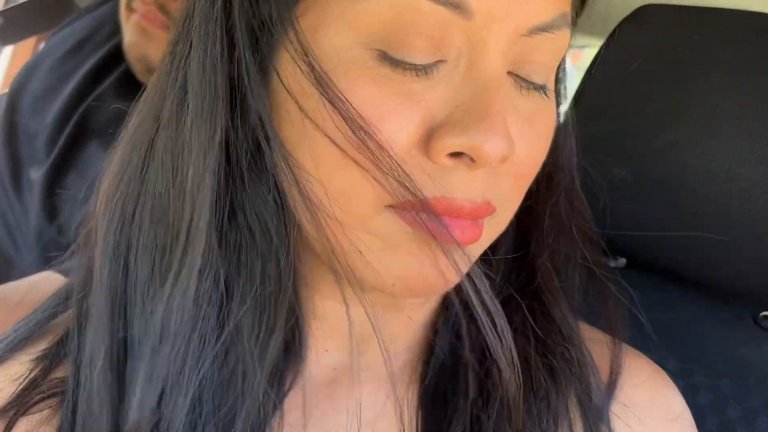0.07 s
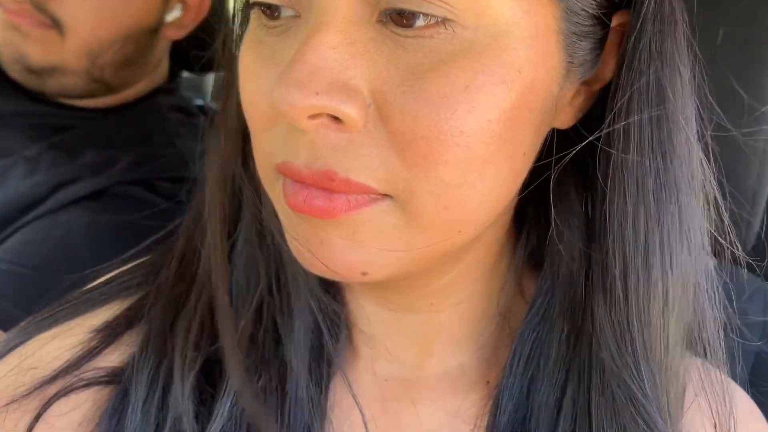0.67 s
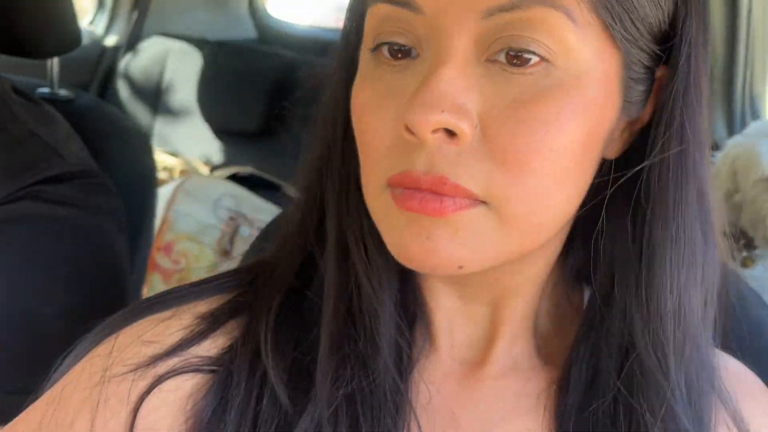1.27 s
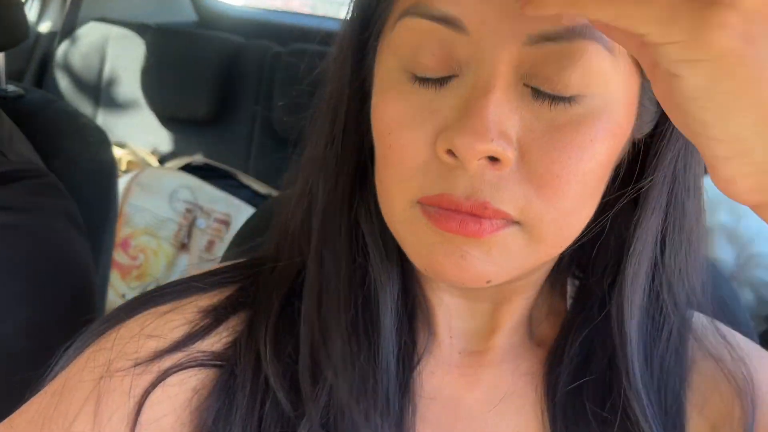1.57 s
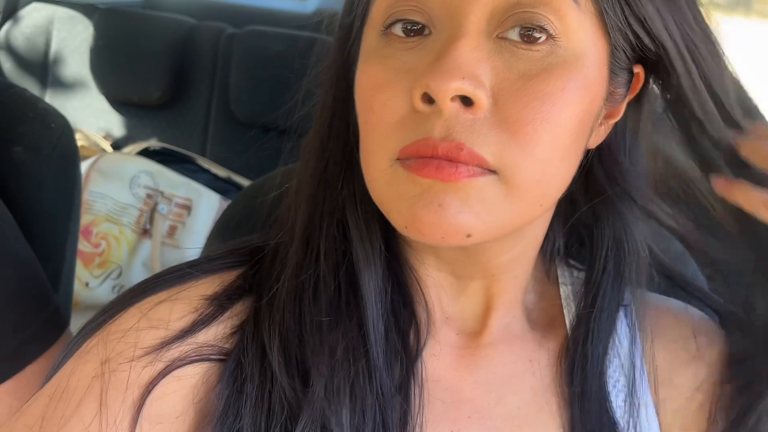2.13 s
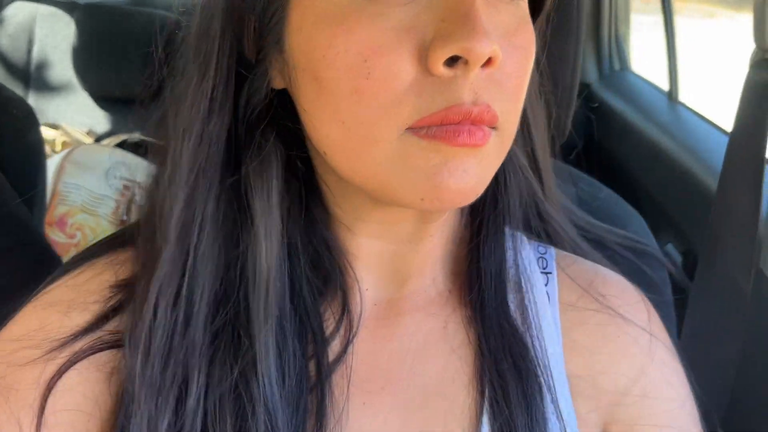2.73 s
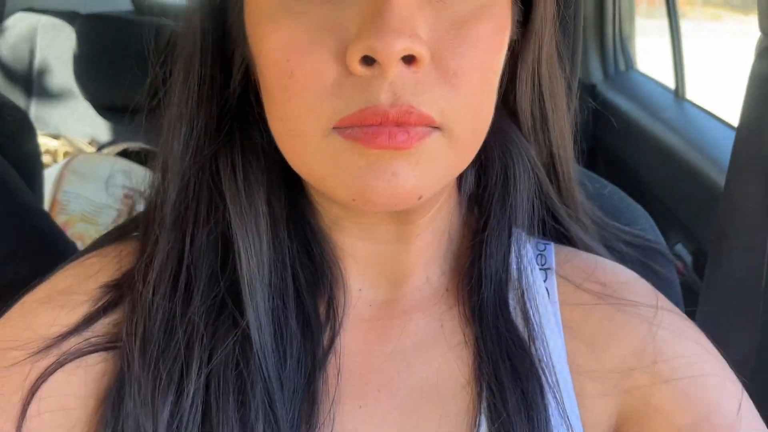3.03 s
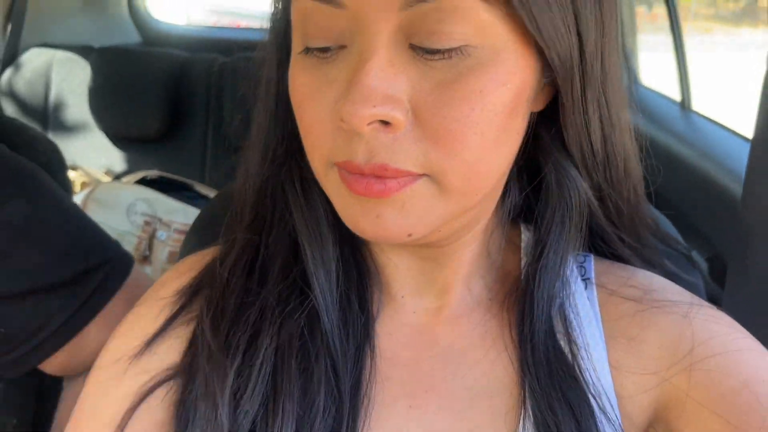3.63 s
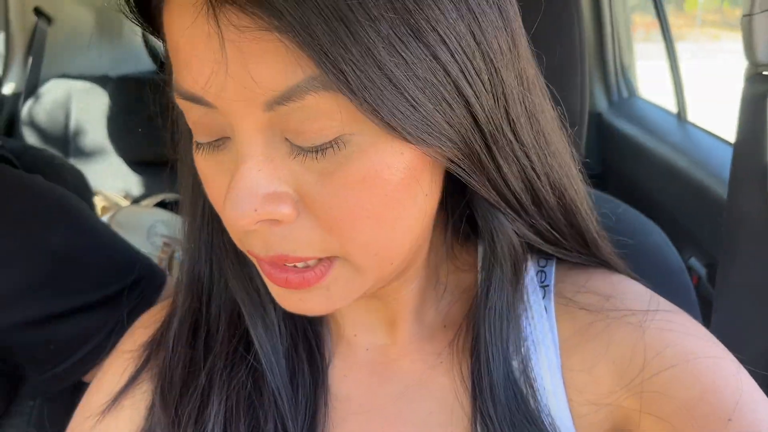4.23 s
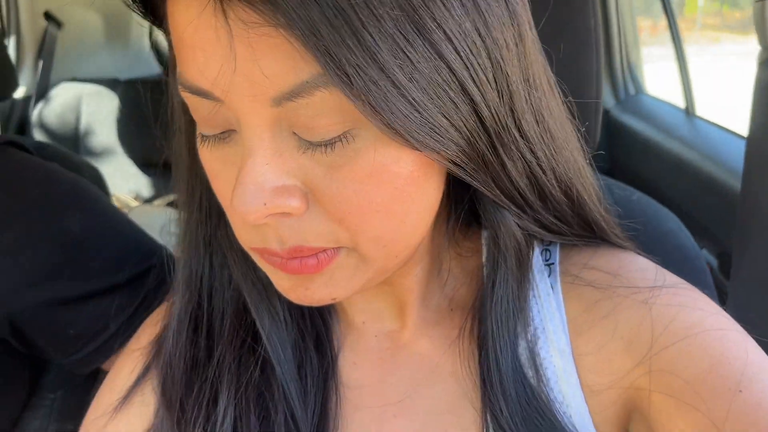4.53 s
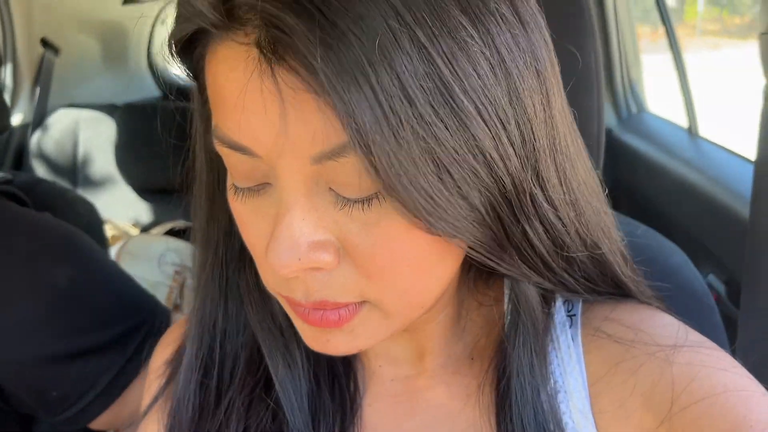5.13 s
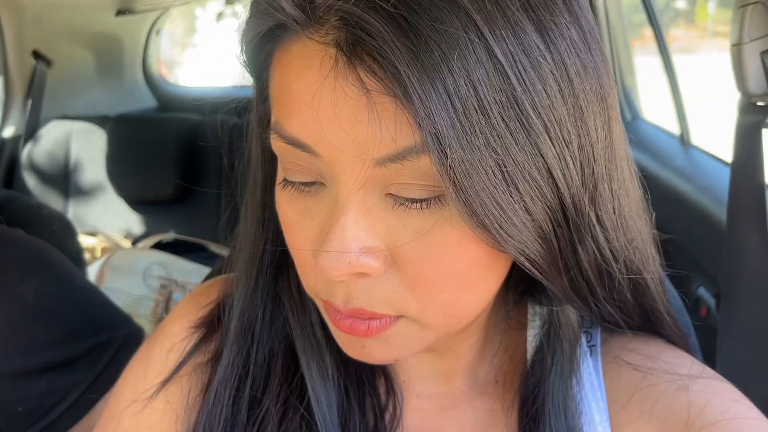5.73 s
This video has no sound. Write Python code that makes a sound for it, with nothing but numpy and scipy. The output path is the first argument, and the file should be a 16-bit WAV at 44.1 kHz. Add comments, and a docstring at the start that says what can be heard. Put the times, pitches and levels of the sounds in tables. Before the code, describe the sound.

Right at the start a car door is pulled shut, heard from inside: the latch scrapes and catches, the panel thuds and the cabin booms, dying away within half a second. This is the loudest sound. Under it and throughout, the engine idles with a low rumble and the vents blow steadily. From about 1 to 3 seconds hair rustles softly in several strokes, with one faint, thin squeak near 2.3 seconds. Soft bumps come through the floor between 2 and 2.5 seconds, and the vent noise shifts tone slightly as the microphone swings round. From 3 seconds to the end, irregular hollow clicks, plastic snaps and dry clacks sound close by. A low bump and a swell of rumble come at about 4.2 seconds as someone shifts in a seat. The clicks are busiest from 4.7 to 5.6 seconds, with a few dull knocks on the trim.

```python
"""A parked car idles with the vents blowing, and right away a door is pulled shut: the latch scrapes
and catches, the panel thuds, the cabin air booms. From about 1 s hair rustles, with one faint squeak,
and the car body rumbles as people shift in their seats. Between 2 and 3 s soft bumps come through the
floor and the vents change colour as the microphone swings round. From 3 s to the end, hollow clicks,
plastic snaps, dry clacks and knocks on the trim sound close by."""
import sys
import numpy as np
from scipy import signal
from scipy.fft import rfft, irfft
from scipy.io import wavfile

SR = 44100
rng = np.random.default_rng(int(sys.argv[2]) if len(sys.argv) > 2 else 0)


def generate_wav(sig):
    """Save sig (samples, or channels by samples) to the path in sys.argv[1] as 16-bit PCM at SR."""
    pcm = np.round(np.clip(np.atleast_2d(sig).T, -1, 1) * 32767).astype(np.int16)
    wavfile.write(sys.argv[1], SR, pcm)


N = 264467
TIME = np.arange(N) / SR
FREQS = np.maximum(np.fft.rfftfreq(N, 1 / SR), 1)

# how alike left and right sound: freq_hz, likeness
STEREO_LIKENESS = [(60, 0.84), (130, 0.9), (290, 0.4), (640, 0.3153), (1400, 0.4539), (3100, 1.04),
                   (6800, -0.4), (8000, 1)]
# how far the left side leads: freq_hz, phase_rad
STEREO_LEAD = [(60, -0.03), (290, -0.32), (700, 2.5), (1500, 3.5), (1780, 1.5), (2070, 2), (4400, 1.03),
               (7500, -4), (11000, -5.5), (15000, -9)]
# how much louder the left side is: freq_hz, balance_db
STEREO_BALANCE = [(60, -0.5), (120, 2.5), (400, 0.5), (1500, 0), (2300, 4.5), (3300, 1.5), (4400, 9),
                  (6500, 5), (9000, 0.5), (15000, -0.5)]

# idle harmonics: firing_multiple, level_db
IDLE_HARMONICS = [(1, -45), (4, -44), (6, -43.5), (7, -48.5), (8, -43), (10, -48), (24, -60.5)]
# blower tone: pitch_hz, level_db
BLOWER_TONE = [(211, -43.5)]
# colour of the engine bay drone: freq_hz, level_db
DRONE_EQ = [(60, 6.5), (100, -3.5), (145, -2.5), (178, -4.5), (205, -3.5), (240, -9), (330, -19.5),
            (500, -18.5)]
# colour of the car body rumble: freq_hz, level_db
RUMBLE_EQ = [(25, -30), (38, -3), (48, -12), (60, -1), (74, -8), (92, -13.5), (140, -10.5), (220, -33.5)]
# people shifting in their seats: peak_s, length_s, level_db
SEAT_SHIFTS = [(1.17, 0.17, -28.5), (1.33, 0.062, -27.5), (1.77, 0.1, -25), (2.13, 0.53, -25),
               (2.51, 0.1, -24), (4.21, 0.13, -20.5), (4.75, 0.28, -21), (5.2, 1, -28), (5.75, 0.29, -29.5)]
# colour of the vent air: freq_hz, level_db
VENT_EQ = [(120, -7.5), (260, 5), (380, 3), (430, -1.5), (520, 0.5), (850, -7.5), (1300, -9.5),
           (1700, -11.5), (2050, -16.5), (3100, -17), (5200, -23), (6600, -25.5), (8300, -42.5),
           (11000, -32.5), (13800, -40.5), (15500, -47)]
# the microphone's swing: start_s, end_s
SWING_SPAN = [2.3, 3.27]
# cabin resonances before and after the swing: freq_hz, width_hz, boost_db
PEAKS_BEFORE = [(524, 114, 6), (752, 130, 6), (1024, 120, 5.5), (1576, 350, 9.5), (2036, 180, 8),
                (2390, 150, 5), (2900, 140, 0), (3680, 150, 3.5), (4450, 89, 1), (5300, 230, 3.5)]
PEAKS_AFTER = [(342, 76, 2), (488, 89, 3.5), (750, 186, 5.5), (1076, 330, 6), (1560, 325, 10.5),
               (1980, 140, 1.5), (2340, 120, 9), (3630, 290, 6.5), (4400, 80, 7), (4800, 170, 9),
               (5260, 130, 7), (6100, 730, 3)]

# colour of the hair rustle: freq_hz, level_db
HAIR_EQ = [(1200, -13), (2500, -9), (4500, 0), (6200, -2.5), (8300, -24), (11500, -12), (14000, -14)]
# resonances in the rustle: freq_hz, width_hz, boost_db
HAIR_SHEEN = [(3600, 290, 3), (4470, 150, 3), (5120, 500, 6)]
# turns of the head and passes of the hand: peak_s, length_s, level_db
HAIR_STROKES = [(.8, 0.38, -60), (1.4, 0.75, -54), (1.92, 0.47, -52.5), (2.27, 0.69, -53.5),
                (2.68, 0.65, -51.5), (3.2, 0.59, -56), (4.2, 0.34, -57.5)]
# the hand sliding off the hair: peak_s, length_s, level_db
HAND_SLIPS = [(2.25, 0.079, -53)]

# soft bumps through the floor: start_s, level_db
FLOOR_BUMPS = [(2.066, -26), (2.195, -28), (2.289, -29), (2.478, -29.5), (4.180, -20.5)]
# floor and seat frame modes: pitch_hz, level_db, t60_s
FRAME_MODES = [(70.2, 16.5, 0.1), (106, -20, 0.023)]
# dull knocks on the trim: start_s, level_db
TRIM_KNOCKS = [(4.669, -19), (4.686, -18.5), (4.763, -17.5), (5.003, -18)]
# trim modes: pitch_hz, level_db, t60_s
TRIM_MODES = [(284, -4, 0.082), (420, 2.5, 0.029), (498, -0.5, 0.047), (750, -13, 0.028)]
# bright plastic ticks: start_s, pitch_hz, level_db
PLASTIC_TICKS = [(3.278, 2960, -42), (4.75, 3070, -21.5), (4.819, 3540, -32), (5.237, 4090, -33)]
# low, dry clacks: start_s, pitch_hz, level_db, t60_s, rise_s
DRY_CLACKS = [(3.018, 616, -12.5, 0.016, 0.001), (3.466, 706, -4, .012, 0.00057)]
# plastic snaps, many leading into a click or clack: start_s, body_db, top_db, t60_s
PLASTIC_SNAPS = [(3.05, -36.5, -49, 0.072), (3.277, -35, -64, 0.062), (3.463, -28, -40, .014),
                 (3.493, -33, -48, 0.011), (3.7255, -37, -58, .08), (4.128, -37, -42.5, 0.034),
                 (4.2175, -52, -48.5, .025), (4.662, -31, -39.5, 0.089), (4.7492, -26, -50, 0.1),
                 (4.755, -28, -33.5, 0.042), (4.819, -29, -41, 0.063), (4.997, -33, -38, 0.057),
                 (5.215, -38, -47, .025), (5.2362, -29, -40, 0.046), (5.3368, -37, -50, 0.072),
                 (5.3972, -38, -48, 0.072), (5.415, -37, -51, 0.055), (5.6414, -35, -46, 0.054)]
# colours of a snap's body and crisp top: freq_hz, level_db
SNAP_BODY_EQ = [(400, -22), (1400, 9), (2400, 0), (3200, 3.5), (5500, -6.5), (7500, -15)]
SNAP_TOP_EQ = [(5500, 9), (7000, 2.5), (8300, -9), (11000, -2), (13500, -9), (15500, -4)]
# small hollow clicks: start_s, pitch_hz, ring_db, overtone_db
HOLLOW_CLICKS = [(3.0518, 1106, -17, -27), (3.1638, 1240, -14.5, -38), (3.1743, 1230, -13, -42),
                 (3.7304, 1230, -16.5, -42), (4.147, 1080, -25, -34), (4.421, 1173, -21.5, -38),
                 (4.666, 1080, -20, -23), (4.675, 1420, -17.5, -36), (4.75, 1093, -11, -26),
                 (4.76, 1325, -12.5, -28), (4.817, 1170, -20, -45), (4.933, 1120, -16, -43),
                 (5, 1047, -17.5, -23), (5.118, 1100, -19, -24), (5.215, 1170, -15.5, -21),
                 (5.237, 1190, -15.5, -24), (5.338, 1300, -14, -21), (5.399, 1214, -20.5, -27),
                 (5.6438, 1240, -12, -15)]
# bounces off nearby surfaces: delay_s, level_db
EARLY_REFLECTIONS = [(0.008, -11.5), (0.015, -13)]

# door contacts: start_s, panel_db, latch_db, latch_t60_s
DOOR_HITS = [(0.0025, -22, -40, 0.045), (0.021, -43, -18.5, 0.25), (0.0368, -11, -20.5, 0.2),
             (0.0525, -22, -26, 0.11), (0.0712, -20, -22.5, 0.075), (0.0785, -5.5, -20, 0.056),
             (0.103, -18, -26, 0.05), (0.1322, -23.5, -41, 0.05), (0.166, -32, -30.5, 0.058)]
# door panel modes: pitch_hz, level_db, t60_s
PANEL_MODES = [(148, -18, 0.074), (203, -5, 0.11), (240, 4.5, 0.053), (310, 3.5, 0.037), (456, 2, 0.057),
               (493, -2.5, 0.037), (660, -5, 0.029), (882, -9.5, 0.091), (1290, -6.5, 0.043)]
# the door hitting its rubber seal and rebounding: start_s, pitch_hz, level_db
SEAL_THUMPS = [(0.0407, 215, 4.4), (0.079, 190, 1.5), (0.116, 192, 5.5)]
# pressure pushes as the door seals: start_s, level_db
AIR_PUSHES = [(0.0481, -5.5), (0.0818, -8), (0.1606, -21)]
# cabin air modes: pitch_hz, level_db, t60_s
CABIN_MODES = [(53.2, 5, 0.32), (78, -17, 0.13), (112, -7, 0.18)]
# the latch catching: start_s, level_db
LATCH_CRACKS = [(0.039, -20), (0.0715, -17.5), (0.1046, -12), (0.1658, -22.5)]
# colours of the latch scrape, the latch crack and the body shudder: freq_hz, level_db
SCRAPE_EQ = [(300, -6), (700, 1), (1300, 3.5), (2100, -0.5), (2900, -5), (4000, -2), (5500, -12.5),
             (7000, -19.5), (8500, -26), (11000, -24), (14000, -28)]
CRACK_EQ = [(1200, -2), (2000, 8.5), (2800, 0), (4200, -0.5), (5900, -1), (7200, -14), (8500, -19),
            (11000, -17), (14500, -19)]
SHUDDER_EQ = [(35, -11), (110, 4), (220, 0), (300, -4.5), (500, -11), (1000, -22), (2500, -28.5),
              (6000, -59)]


def from_db(db):
    """Decibels to gain."""
    return 10 ** (np.asarray(db) / 20)


def rms_one(x):
    """Scale to unit rms."""
    return x / np.sqrt(np.mean(x ** 2) + 1e-20)


def over_hz(points):
    """Join points into a curve on a log-frequency axis."""
    hz, value = np.transpose(points)
    return np.interp(np.log(FREQS), np.log(hz), value)


def drift(rate_hz):
    """Smooth random modulation at unit rms, mostly slower than rate_hz."""
    return rms_one(irfft(rfft(rng.standard_normal(N)) / (1 + (FREQS / rate_hz) ** 2), N))


def cabin_noise(eq, peaks=()):
    """Coloured noise at unit rms with the cabin's stereo image, rolling off past the ends of its EQ."""
    boost_db = sum(db / (1 + (2 * (FREQS - hz) / width) ** 2) for hz, width, db in peaks)
    rolloff = 1 / (1 + (eq[0][0] / FREQS) ** 8 + (FREQS / eq[-1][0]) ** 8)
    left, other = rfft(rng.standard_normal((2, N)))
    alike = np.clip(over_hz(STEREO_LIKENESS), 0, 1)
    right = (alike * left + np.sqrt(1 - alike ** 2) * other) * np.exp(-1j * over_hz(STEREO_LEAD))
    lean = from_db(over_hz(STEREO_BALANCE) / 2)
    stereo = np.array([left * lean, right / lean])
    return rms_one(irfft(stereo * from_db(over_hz(eq) + boost_db) * rolloff, N))


def ring(start_s, hz, level_db, t60_s, rise_s, lead_s):
    """A struck mode: a sine that swells and dies, the left side ahead by lead_s."""
    out = np.zeros((2, N))
    start = int(start_s * SR)
    age = TIME[:min(int(1.5 * t60_s * SR), N - start)]
    envelope = from_db(level_db - 60 * age / t60_s) * (1 - np.exp(-age / rise_s))
    tone = np.sin(2 * np.pi * hz * (age - np.array([[0], [lead_s]])))
    out[:, start:start + len(age)] = envelope * tone
    return out


def strike(blows, modes, rise_s, lead_s):
    """Every blow (start_s, level_db) sets all the modes of a body ringing."""
    return sum(ring(s, hz, db + mode_db, t60, rise_s, lead_s)
               for s, db in blows for hz, mode_db, t60 in modes)


def bursts(rows, attack_share=0.00065):
    """Envelope of hits (start_s, level_db, t60_s) whose powers add; each attack is a share of its t60."""
    power = np.zeros(N)
    for start_s, level_db, t60 in rows:
        start = int(start_s * SR)
        age = TIME[:min(int(t60 * SR), N - start)]
        attack = 1 - np.exp(-age / (attack_share * t60))
        power[start:start + len(age)] += (from_db(level_db - 60 * age / t60) * attack) ** 2
    return np.sqrt(power)


def swells(rows):
    """Envelope of smooth movements (peak_s, length_s, level_db) whose powers add."""
    power = sum(from_db(db) ** 2 * np.exp(-2 * (2 * (TIME - s) / length) ** 2) for s, length, db in rows)
    return np.sqrt(power)


def engine(firing_hz=27.73, wander=0.00327, flutter_db=3.0, drone_db=-33.5):
    """Firing harmonics and the blower tone waver over the steady drone of the engine bay."""
    wavering_time = np.cumsum(1 + wander * drift(2.4)) / SR
    tones = [(multiple * firing_hz, db) for multiple, db in IDLE_HARMONICS] + BLOWER_TONE
    hum = np.zeros(N)
    for hz, db in tones:
        level = np.sqrt(2) * from_db(db + flutter_db * drift(3.4))
        hum += level * np.sin(2 * np.pi * (hz * wavering_time + rng.random()))
    lean_left = from_db([[-.3], [-2.2]])
    return hum * lean_left + from_db(drone_db) * cabin_noise(DRONE_EQ)


def body_rumble(idle_db=-33.5, uneven_db=1.5):
    """The car body rumbles a little unevenly, and more when weight shifts on the seats."""
    idle = from_db(idle_db + uneven_db * drift(3.0))
    return np.hypot(idle, swells(SEAT_SHIFTS)) * cabin_noise(RUMBLE_EQ)


def swaying_air(peaks, detune=0.013):
    """Vent noise whose resonances slide a little as the hand-held microphone sways."""
    low = cabin_noise(VENT_EQ, [(hz * (1 - detune), width, db) for hz, width, db in peaks])
    high = cabin_noise(VENT_EQ, [(hz * (1 + detune), width, db) for hz, width, db in peaks])
    sway = np.pi / 4 * (1 + np.tanh(drift(1.3)))
    return np.cos(sway) * low + np.sin(sway) * high


def vents(level_db=-36, waver_db=.5):
    """A bed of blown air crossfades between two cabin colours as the microphone swings round."""
    turn = np.interp(TIME, SWING_SPAN, [0, np.pi / 2])
    air = np.cos(turn) * swaying_air(PEAKS_BEFORE) + np.sin(turn) * swaying_air(PEAKS_AFTER)
    return from_db(level_db + waver_db * drift(4.1)) * air


def hair_rustle(grain_db=1.8):
    """Hair slides over the shoulders in soft, grainy strokes."""
    return swells(HAIR_STROKES) * cabin_noise(HAIR_EQ, HAIR_SHEEN) * from_db(grain_db * drift(40))


def hand_squeak(pitch_hz=4360, wander=0.0138):
    """A thin, unsteady stick-slip tone as the hand slides off the hair."""
    wavering_time = np.cumsum(1 + wander * drift(60)) / SR
    return swells(HAND_SLIPS) * np.sqrt(2) * np.sin(2 * np.pi * pitch_hz * wavering_time)


def knocks():
    """Soft bumps ring the floor; dull knocks and bright ticks ring the trim."""
    floor = strike(FLOOR_BUMPS, FRAME_MODES, rise_s=0.0064, lead_s=0.00042)
    trim = strike(TRIM_KNOCKS, TRIM_MODES, rise_s=0.0011, lead_s=0.00028)
    ticks = sum(ring(s, hz, db, t60_s=0.035, rise_s=0.00084, lead_s=.00005) for s, hz, db in PLASTIC_TICKS)
    return floor + trim + ticks


def clacks(overtone_ratio=1.98, overtone_db=-3):
    """A low ring that dies within a few cycles, with a still shorter overtone."""
    out = np.zeros((2, N))
    for s, hz, db, t60, rise in DRY_CLACKS:
        out += ring(s, hz, db, t60, rise, lead_s=0.00033)
        out += ring(s, hz * overtone_ratio, db + overtone_db, t60_s=0.0054, rise_s=rise, lead_s=0.00014)
    return out


def snaps(crackle_db=2.0, tip_db=4, tip_t60_s=0.004):
    """Plastic snaps: crackly bursts with a needle-sharp tip, each with its own share of crisp treble."""
    bodies = [(s, db, t60) for s, db, _, t60 in PLASTIC_SNAPS]
    tops = [(s, db, t60) for s, _, db, t60 in PLASTIC_SNAPS]
    tips = [(s, db + tip_db, tip_t60_s) for s, db, _ in tops]
    body = bursts(bodies, attack_share=0.016) * cabin_noise(SNAP_BODY_EQ)
    top = bursts(tops + tips, attack_share=0.018) * cabin_noise(SNAP_TOP_EQ)
    return (body + top) * from_db(crackle_db * drift(400))


def clicks(overtone_ratio=1.553, rough_db=2.5):
    """Each click is a short, rough, hollow ring with one overtone, thrown back by nearby surfaces."""
    direct = np.zeros((2, N))
    for s, hz, ring_db, overtone_db in HOLLOW_CLICKS:
        direct += ring(s, hz, ring_db, t60_s=0.02, rise_s=0.0013, lead_s=0.00014)
        direct += ring(s, hz * overtone_ratio, overtone_db, t60_s=0.017, rise_s=0.0019, lead_s=0.00013)
    bounced = sum(from_db(db) * np.roll(direct, int(delay * SR), axis=1) for delay, db in EARLY_REFLECTIONS)
    return (direct + bounced) * from_db(rough_db * drift(350))


def door_latch(rattle_db=2.5, crack_t60_s=0.022):
    """The latch scrapes and rattles at each contact, and cracks as it catches."""
    scrape = bursts([(s, db, t60) for s, _, db, t60 in DOOR_HITS]) * cabin_noise(SCRAPE_EQ)
    rattle = from_db(rattle_db * drift(250))
    catches = bursts([(s, db, crack_t60_s) for s, db in LATCH_CRACKS], attack_share=0.029)
    return scrape * rattle + catches * cabin_noise(CRACK_EQ)


def door_thud(shudder_db=-7.5, shudder_t60_s=.5):
    """Panel and rubber seal thud, the trapped air booms and the car body shudders on."""
    blows = [(s, db) for s, db, *_ in DOOR_HITS]
    panel = strike(blows, PANEL_MODES, rise_s=0.0016, lead_s=0.00027)
    seal = sum(ring(s, hz, db, t60_s=0.027, rise_s=0.0042, lead_s=0) for s, hz, db in SEAL_THUMPS)
    boom = strike(AIR_PUSHES, CABIN_MODES, rise_s=0.012, lead_s=0.0011)
    shudder = bursts([(s, db, shudder_t60_s) for s, db in blows]) * cabin_noise(SHUDDER_EQ)
    lean_left = from_db([[1.9], [-1.9]])
    return (panel + seal + boom) * lean_left + from_db(shudder_db) * shudder


def scene():
    """The mix from the front seat: idling bed, close movement, and the door on top."""
    bed = engine() + body_rumble() + vents()
    movement = hair_rustle() + hand_squeak() + knocks() + clacks() + snaps() + clicks()
    return bed + movement + door_latch() + door_thud()


def record(dry, low_cut_hz=20, ceiling=.95, high_cut_hz=15700):
    """Trim the deepest bass, round off the peaks and cut the top."""
    trimmed = signal.sosfilt(signal.butter(2, low_cut_hz, "high", fs=SR, output="sos"), dry)
    rounded = ceiling * np.tanh(trimmed / ceiling)
    return signal.sosfilt(signal.ellip(10, .1, 90, high_cut_hz, fs=SR, output="sos"), rounded)


dry = scene()
out = record(dry)
generate_wav(out)
```